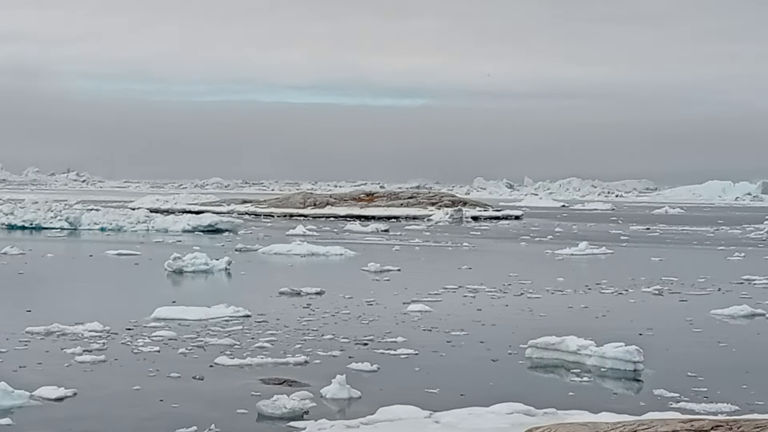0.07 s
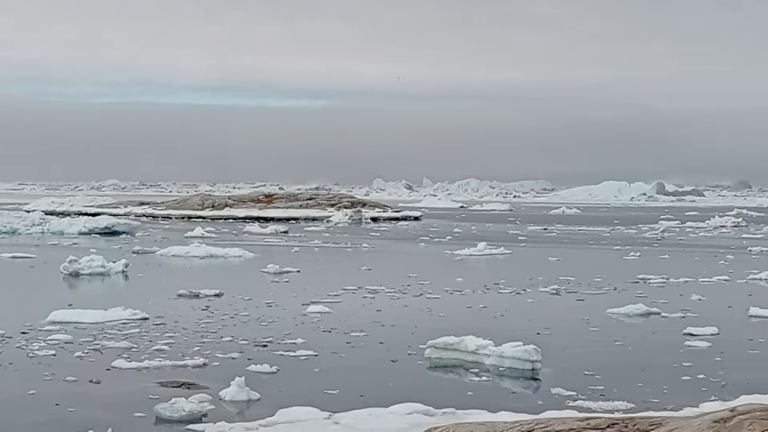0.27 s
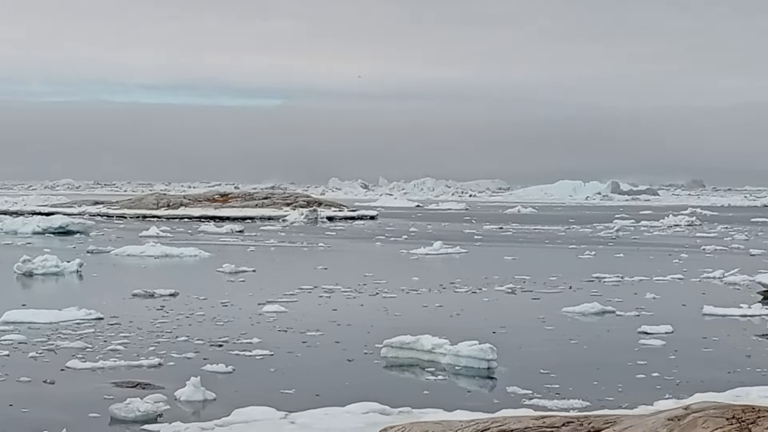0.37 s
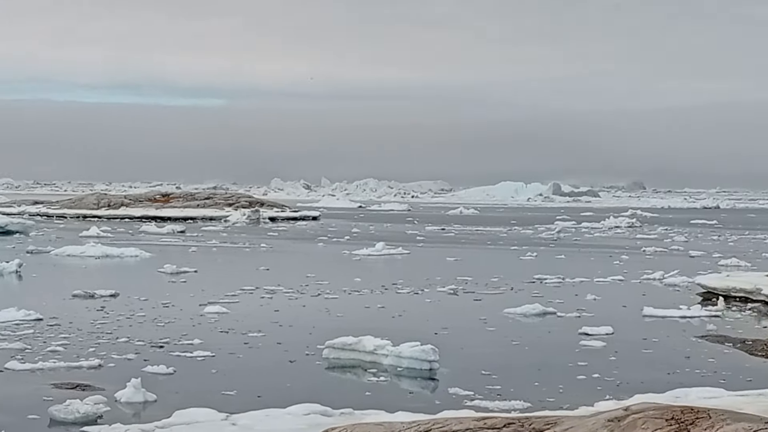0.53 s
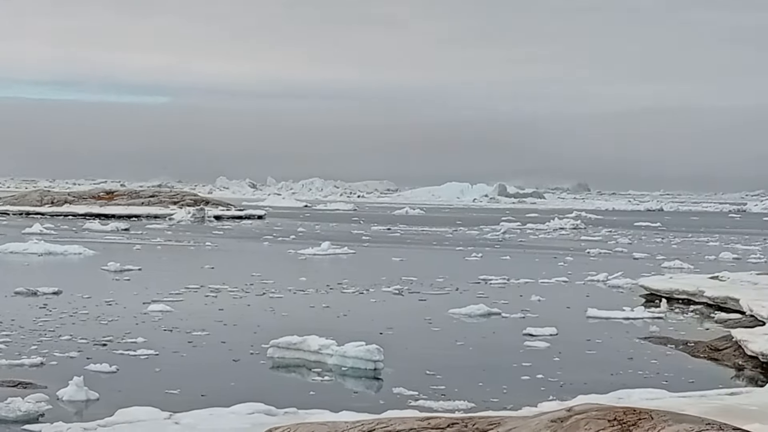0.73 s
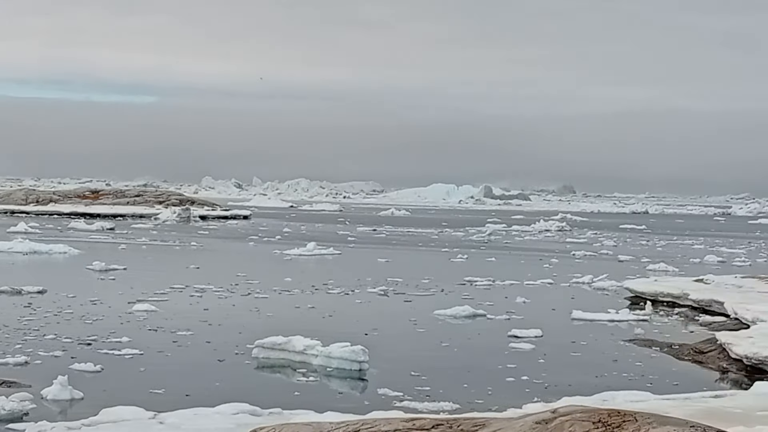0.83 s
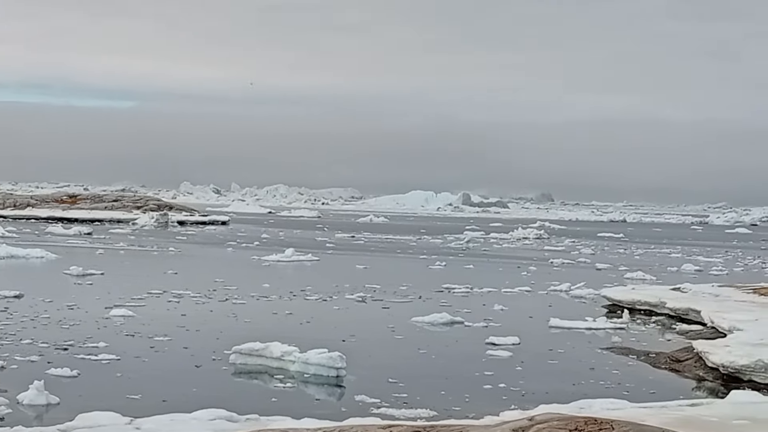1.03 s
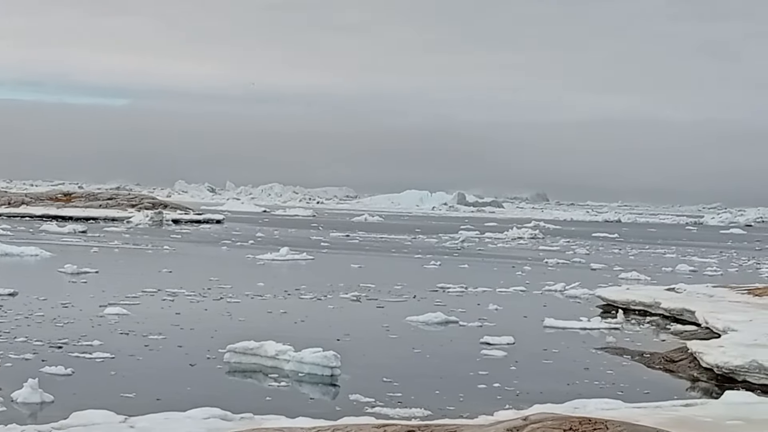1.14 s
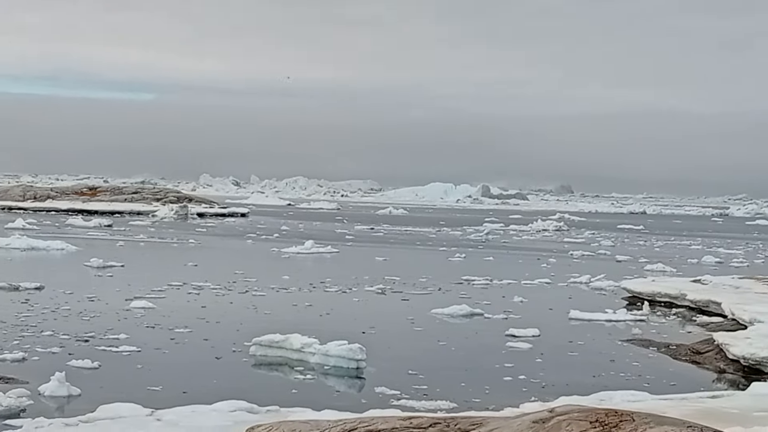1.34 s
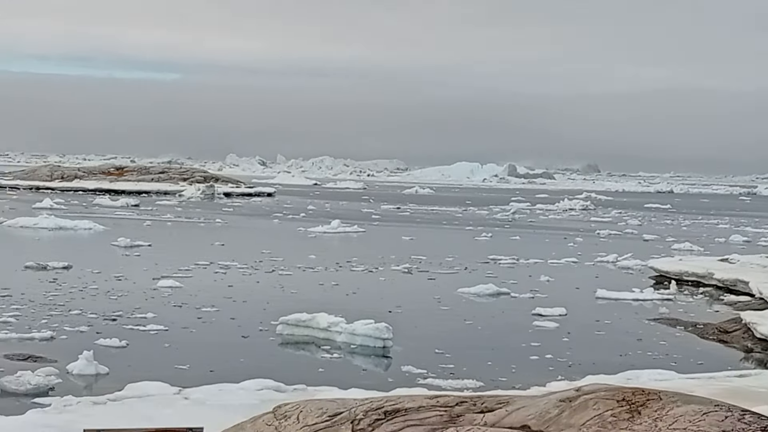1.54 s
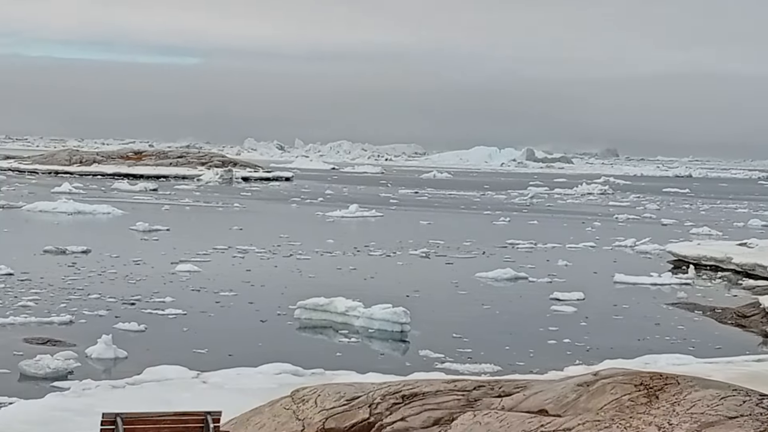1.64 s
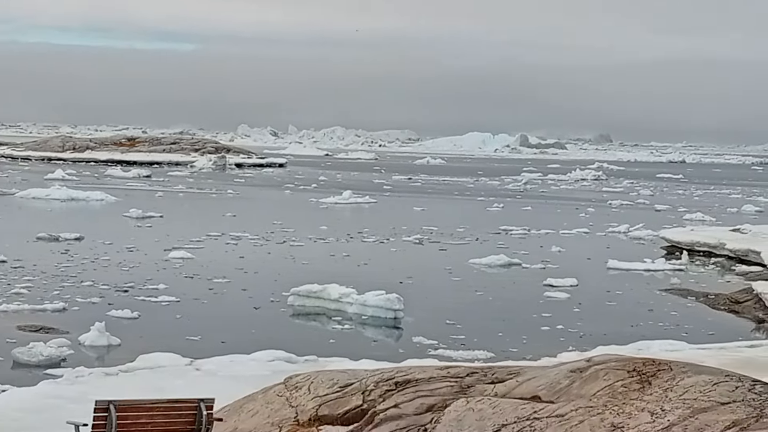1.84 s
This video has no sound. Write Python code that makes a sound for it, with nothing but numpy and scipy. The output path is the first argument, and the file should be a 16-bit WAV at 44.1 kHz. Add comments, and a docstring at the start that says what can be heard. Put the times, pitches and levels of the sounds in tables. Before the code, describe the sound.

Wind gusts rumbling and thumping on a microphone over a soft outdoor hiss.

```python
"""Light wind on a microphone above a calm, icy bay. A soft outdoor hiss opens over a low murmur.
From 0.2 s gusts rumble on the microphone port and single eddies thump it, some breaking into puffs.
Faint ticks dot the first second; small plinks, perhaps of melting ice, are scattered throughout.
The wind hits hardest near 1.3 s and dies away by about 1.7 s, leaving the hiss and the murmur."""
import sys
import numpy as np
from scipy import signal
from scipy.fft import rfft, irfft, next_fast_len
from scipy.io import wavfile
from scipy.ndimage import uniform_filter1d

SR = 44100
rng = np.random.default_rng(int(sys.argv[2]) if len(sys.argv) > 2 else 0)


def wav_out(sig):
    """Save sig, one row per channel (or a flat mono array), as 16-bit PCM at SR to the path in sys.argv[1]."""
    wavfile.write(sys.argv[1], SR, np.round(np.clip(np.atleast_2d(sig).T, -1, 1) * 32767).astype(np.int16))


N = 83790
EVEN_S = 0.036  # time over which the flow holds its strength


def gust(start, end, first_db, last_db, centre_hz):
    """Strength and rumble of one gust: it rises fast, swells or fades, and drops away."""
    # tone of the rumble: (frequency [multiple of the centre], level [dB])
    colour = [(.15, -56.5), (.25, -29), (.45, -8), (.72, 2), (1.15, 3.5), (1.5, -6.5), (2, -17), (2.6, -26),
              (3.5, -39.5), (5, -60), (8, -68), (14, -120)]
    attack_s, release_s = 0.0061, 0.0084
    t = clock()
    rise = np.exp(-(np.maximum(start - t, 0) / attack_s) ** 2)
    fall = np.exp(-(np.maximum(t - end, 0) / release_s) ** 2)
    strength = rise * fall * amp(np.interp(t, [start, end], [first_db, last_db]))
    rumble = even(noise([(k * centre_hz, db) for k, db in colour]), EVEN_S)
    return strength, strength * rumble


def wind():
    """Gusts rumble on the port, and finer turbulence flutters on top of the strong ones."""
    # gusts: (start [s], end [s], start level [dB], end level [dB], centre [Hz])
    gusts = [(0.2, 0.227, -42, -49.5, 141), (0.251, 0.279, -46.5, -54, 85),
             (0.303, 0.361, -44.5, -48.5, 101), (0.389, 0.471, -40, -39.5, 120),
             (0.493, 0.576, -30, -47.5, 117.3), (0.599, 0.672, -40.5, -49, 101),
             (0.694, 0.747, -53, -48, 113.6), (0.77, 0.952, -47.5, -48, 93),
             (0.969, 1.007, -38.5, -41.5, 96.7), (1.022, 1.058, -49, -41, 130),
             (1.093, 1.158, -50, -40.5, 110), (1.178, 1.228, -44.5, -37, 117),
             (1.243, 1.336, -35, -40.5, 143), (1.364, 1.409, -42, -54, 109.5),
             (1.446, 1.466, -39.5, -39.5, 125), (1.494, 1.512, -42, -44, 145),
             (1.526, 1.617, -37.5, -42, 144), (1.633, 1.658, -56, -49.5, 106),
             (1.677, 1.722, -68, -59.5, 101)]
    # tone of the fine turbulence: (frequency [Hz], level [dB])
    flutter_colour = [(60, -30), (150, -1), (230, 2), (330, -7.5), (480, -16.5), (700, -46.5),
                      (1100, -59.5)]
    strong_db, flutter_db = -29, -57  # a strong gust, and the flutter it carries
    growth = 1.6  # dB of flutter per dB of wind
    strength, rumble = np.sum([gust(*row) for row in gusts], axis=0)
    flutter = even(noise(flutter_colour), EVEN_S)
    return rumble + amp(flutter_db) * (strength / amp(strong_db)) ** growth * flutter


def eddies():
    """Each eddy thumps the membrane with a push and a pull; rough puffs mark the flow breaking up."""
    # eddies hitting the port: (time [s], level [dB], pitch [Hz], half length [s])
    hits = [(0.2031, -33.5, 190, 0.0057), (0.413, -43.5, 250, 0.0039), (0.42, -28, 208.5, 0.0067),
            (0.4945, -24.5, 116.6, 0.0028), (0.770, -33.5, 121, 0.0036), (1.001, -40, 210, 0.0064),
            (1.041, -35, 172, 0.0027), (1.244, -21, 290, 0.0019), (1.257, -29, 273, 0.0055),
            (1.289, -16.5, 174, .0018), (1.305, -37, 281, 0.0044), (1.3325, -23, 198.6, 0.0034),
            (1.468, -28.5, 126, 0.01), (1.524, -33, 183, 0.0057), (1.614, -40.5, 165, 0.0032)]
    # rough puffs: (time [s], level [dB], pitch [Hz], width [Hz], half length [s])
    puffs = [(0.4153, -52, 492, 45, 0.011), (0.497, -63, 467, 60, 0.013), (0.652, -65, 390, 50, 0.01),
             (1.2425, -45.5, 588, 164, 0.0056), (1.260, -46, 480, 169, 0.0064),
             (1.288, -46, 523, 171, 0.0028), (1.295, -57, 437, 82.3, 0.019), (1.336, -64, 462, 70, 0.0075),
             (1.248, -68.5, 1770, 2440, 0.013)]
    thumps = sum(amp(db) * swell(s, half_s) * np.sin(2 * np.pi * hz * (s - clock()))
                 for s, db, hz, half_s in hits)
    return thumps + sum(burst(*row) for row in puffs)


def ticks():
    """Tiny bright snaps of noise that die at once."""
    # faint ticks: (time [s], level [dB], tilt [dB per octave])
    snaps = [(0.247, -64, 2), (0.3139, -57, -1), (0.492, -65, 9), (0.598, -68, 8), (0.845, -56.5, 4)]
    # tone of a tick before its tilt: (frequency [Hz], level [dB])
    colour = [(3000, -37), (8000, -12.5), (10000, -4), (11000, 5), (12500, -12.5), (15000, -2)]
    attack_s, t60_s, pivot_hz = .0006, .025, 11000
    out = np.zeros(N)
    for s, db, tilt in snaps:
        age = np.maximum(clock() - s, 0)
        envelope = amp(db - 60 * age / t60_s) * (1 - np.exp(-age / attack_s))
        tilted = [(hz, level + tilt * np.log2(hz / pivot_hz)) for hz, level in colour]
        out += envelope * noise(tilted) / 2
    return out


def plinks():
    """Soft plinks and fizzes, perhaps of melting ice: noise narrow enough to carry a pitch."""
    # plinks and fizzes: (time [s], level [dB], pitch [Hz], width [Hz], half length [s])
    pings = [(0.128, -71, 2350, 69.3, 0.012), (0.165, -75.5, 4980, 90, 0.025),
             (0.356, -72, 2030, 154, .008), (0.608, -71, 1930, 120, 0.011),
             (0.793, -70.5, 1640, 69.5, 0.0097), (0.825, -69, 4200, 403, 0.0065),
             (0.832, -80, 5880, 410, 0.12), (0.85, -73, 10800, 220, .005), (1.396, -72.5, 4630, 159, 0.013),
             (1.469, -72.5, 10420, 280, 0.0062), (1.714, -79.5, 4800, 182, .02),
             (1.734, -70, 1364, 90, 0.018)]
    return sum(burst(*row) for row in pings)


def bay():
    """The outdoor bed: a soft, slightly patchy hiss over the bay's distant, steady murmur."""
    # tone of the hiss: (frequency [Hz], level [dB])
    hiss_colour = [(590, -18.5), (1000, -8), (1180, -6.5), (1500, -1.5), (2320, -5), (2540, -9),
                   (3130, -11.5), (3810, -8), (5900, -13.5), (7260, -19.5), (8140, -29.5), (10100, -21.5),
                   (10600, -20.5), (11800, -26), (13200, -30), (14800, -23.5), (15700, -19)]
    # fader ride of the hiss: (time [s], level [dB])
    hiss_level = [(0.0, -81), (0.118, -73.5), (0.494, -74.5), (0.848, -72.5), (0.874, -73.5), (1.87, -73.5)]
    # tone of the low murmur: (frequency [Hz], level [dB])
    murmur_colour = [(15, -52.5), (25, -26.5), (75, 7), (209, -8), (293, 1), (433, -16.5), (469, -9.5),
                     (628, -16.5), (762, -13), (1200, -37.5), (1560, -60), (2640, -120)]
    fader = amp(np.interp(clock(), *np.transpose(hiss_level)))
    hiss = fader * patchy(noise(hiss_colour), depth_db=1.97)
    return hiss + amp(-69) * noise(murmur_colour)


def amp(db):
    return 10 ** (np.asarray(db) / 20)


def unit(x):
    return x / np.sqrt(np.mean(x ** 2) + 1e-20)


def clock():
    return np.arange(N) / SR


def filtered(x, response):
    """x through an EQ whose gain is response(hz)."""
    size = next_fast_len(N + 8192, True)
    return irfft(rfft(x, size) * response(np.fft.rfftfreq(size, 1 / SR)), size)[:N]


def noise(colour):
    """Noise of rms 1, coloured by (frequency [Hz], level [dB]) points."""
    freqs, db = np.transpose(colour)
    white = rng.standard_normal(N)
    return unit(filtered(white, lambda hz: amp(np.interp(np.log(hz + 1), np.log(freqs + 1), db))))


def even(x, span_s):
    """A leveller: irons out chance swells slower than span_s."""
    power = filtered(x ** 2, lambda hz: np.exp(-(hz * span_s) ** 2))
    return unit(x / np.sqrt(np.abs(power) + 1e-3))


def swell(s, half_s):
    """A bell-shaped envelope around time s."""
    return np.exp(-((clock() - s) / half_s) ** 2)


def burst(s, db, centre_hz, width_hz, half_s):
    """A short swell of band-passed noise."""
    white = rng.standard_normal(N)
    band = unit(filtered(white, lambda hz: np.exp(-((hz - centre_hz) / width_hz) ** 2 / 2)))
    return amp(db) * swell(s, half_s) * even(band, 2 * half_s)


def patchy(x, depth_db):
    """x with patches of random gain in time and frequency."""
    spectra = signal.stft(x, nperseg=512)[2]
    patches = uniform_filter1d(rng.standard_normal(spectra.shape), size=5, axis=0)
    patches = uniform_filter1d(patches, size=8, axis=1)
    return unit(signal.istft(spectra * amp(depth_db * unit(patches)), nperseg=512)[1][:N])


def scene():
    """Wind up front on the port, the bay and its small sounds behind, in mono."""
    return (wind() + eddies() + bay() + plinks() + ticks())[None]


def record(dry):
    """The recorder keeps nothing above its band limit."""
    top_hz = 15800
    return np.array([filtered(x, lambda hz: hz < top_hz) for x in dry])


dry = scene()
out = record(dry)
wav_out(out)
```